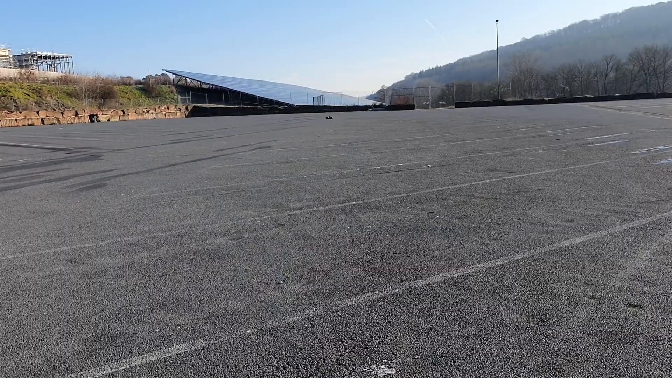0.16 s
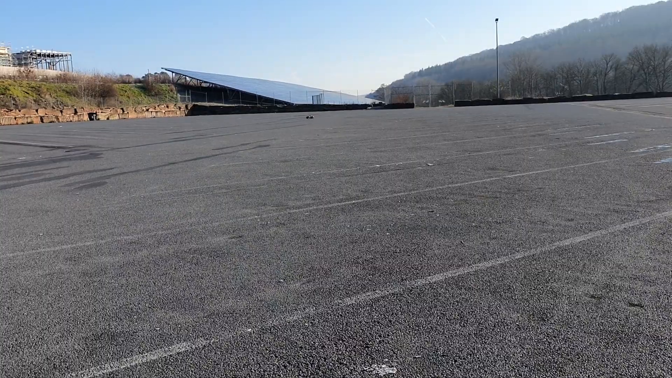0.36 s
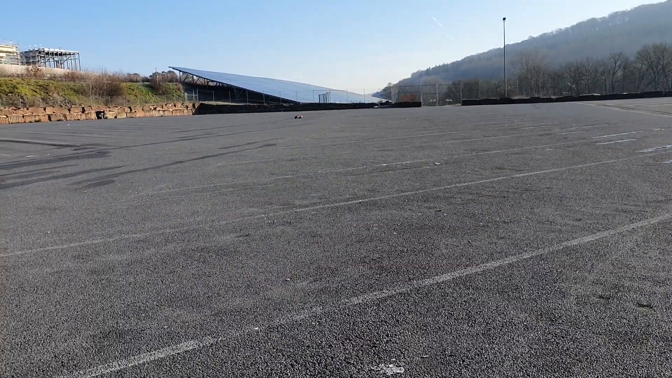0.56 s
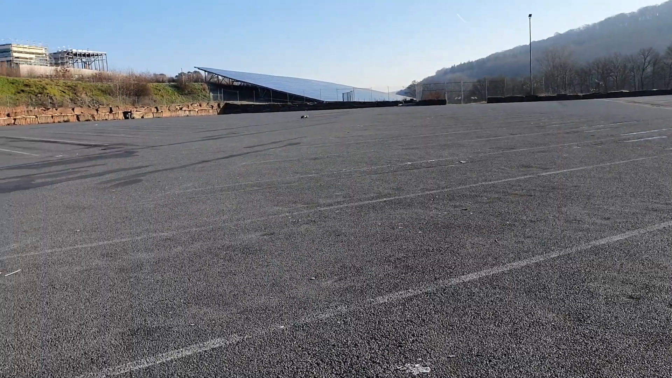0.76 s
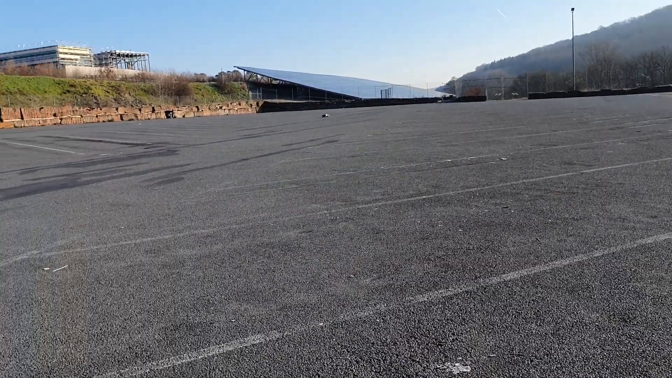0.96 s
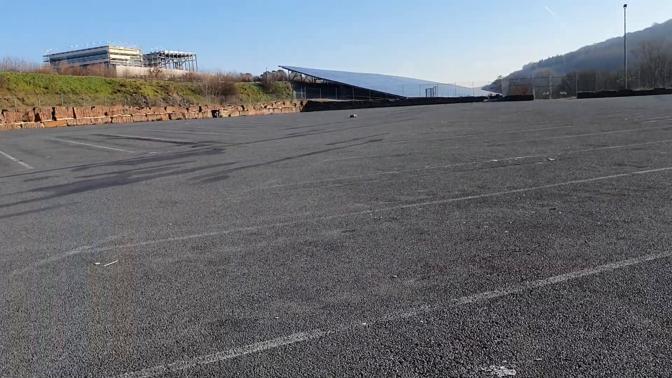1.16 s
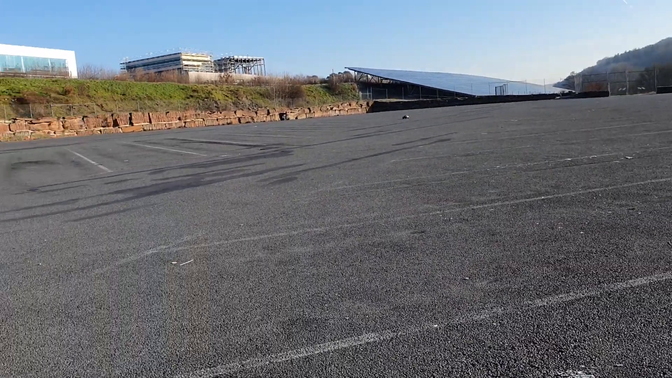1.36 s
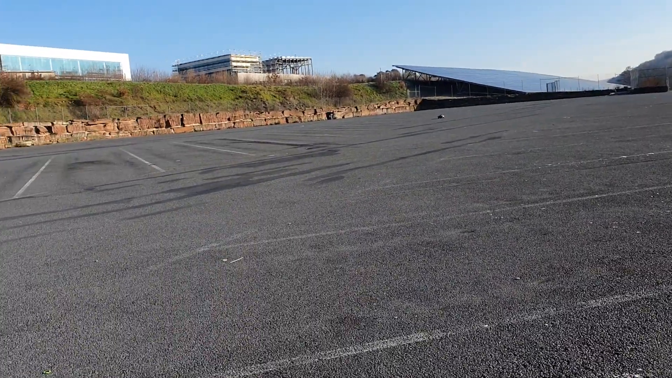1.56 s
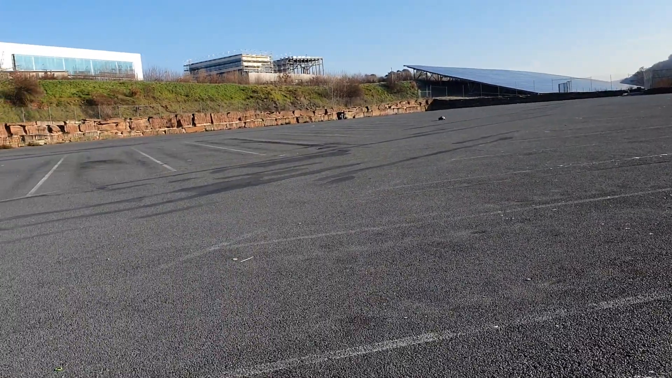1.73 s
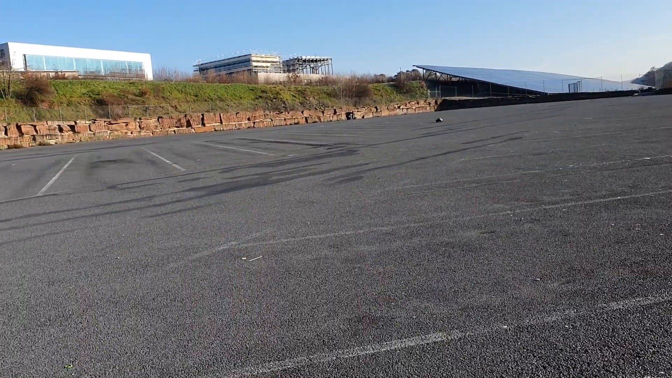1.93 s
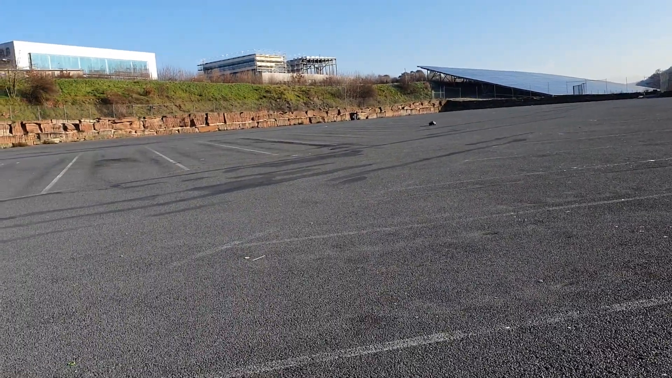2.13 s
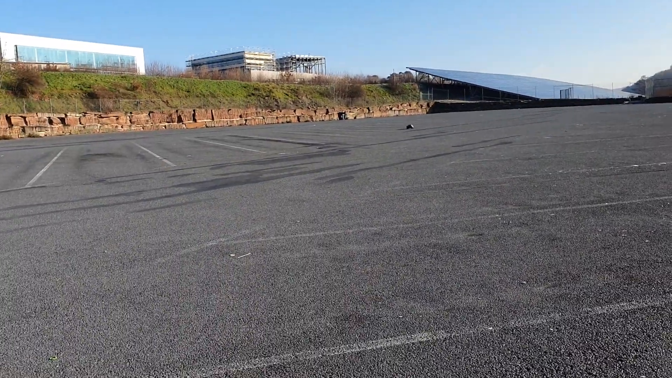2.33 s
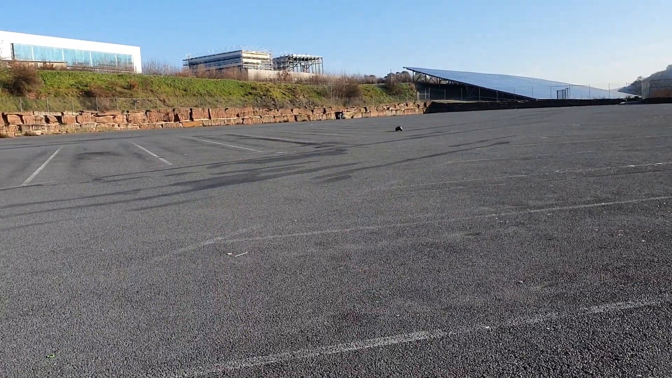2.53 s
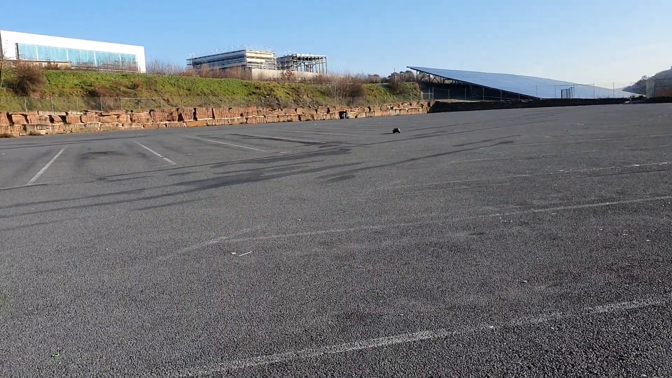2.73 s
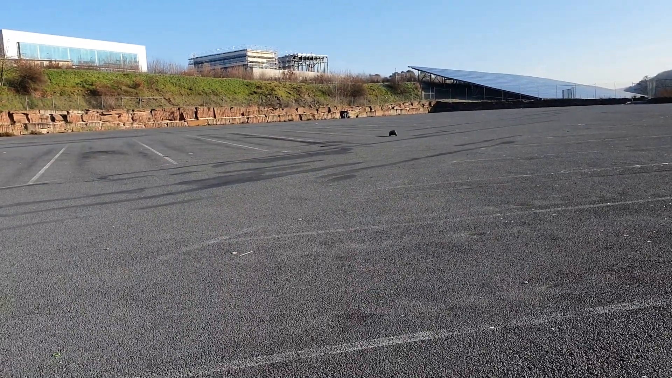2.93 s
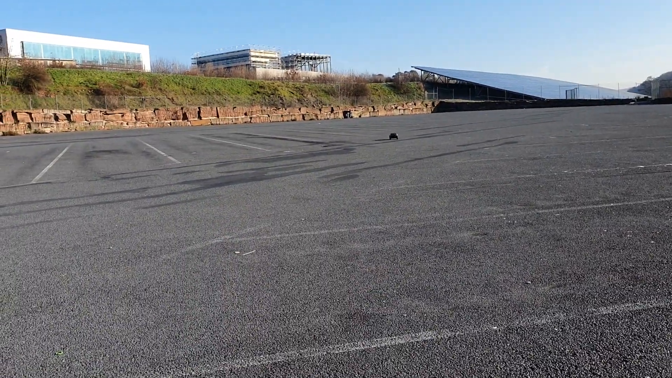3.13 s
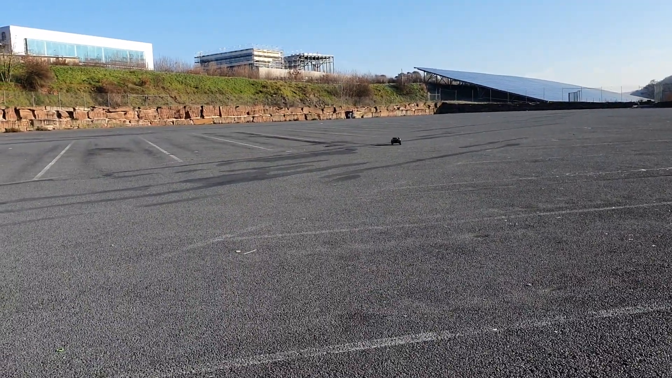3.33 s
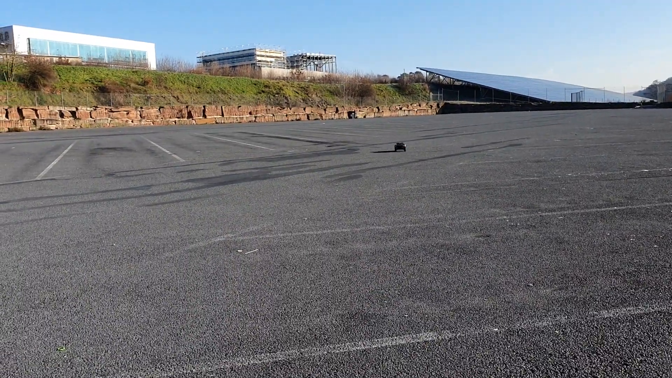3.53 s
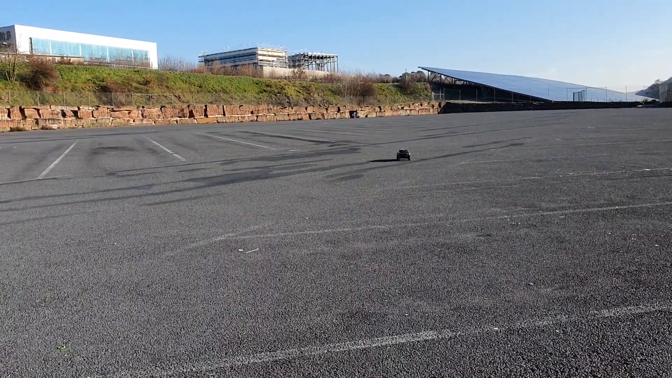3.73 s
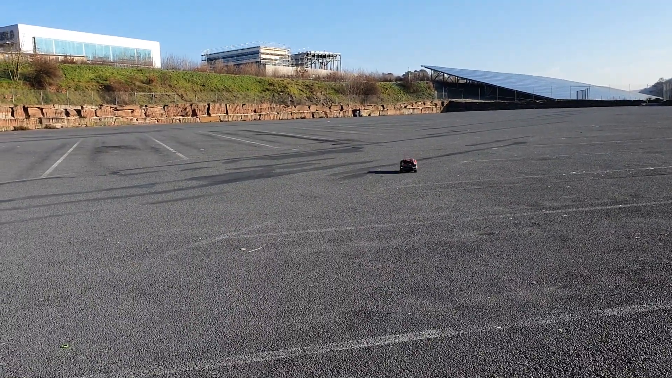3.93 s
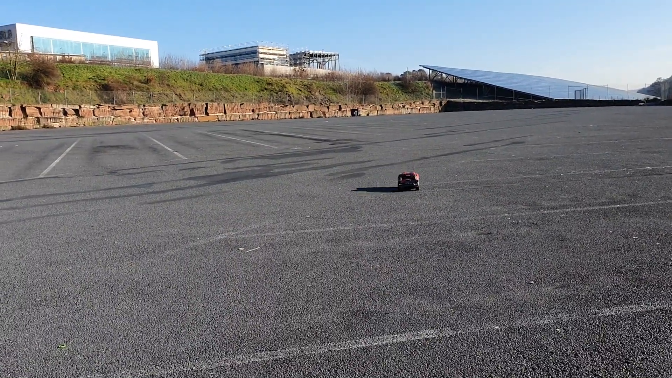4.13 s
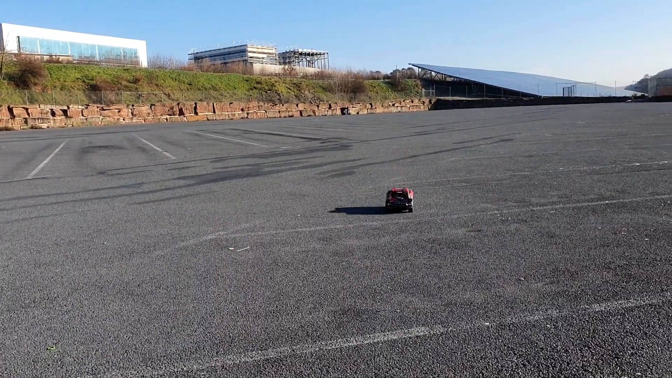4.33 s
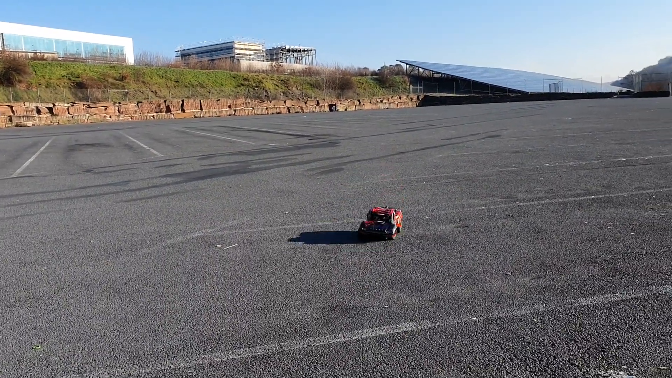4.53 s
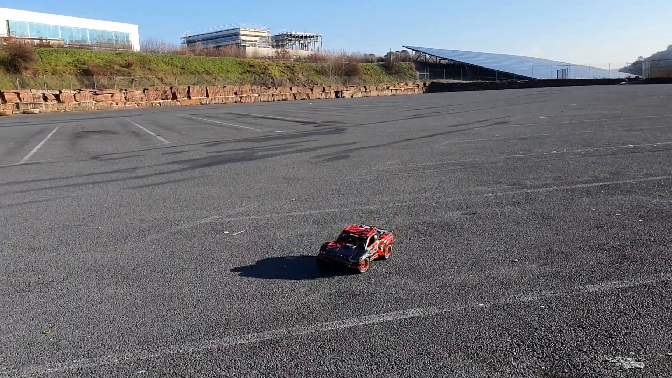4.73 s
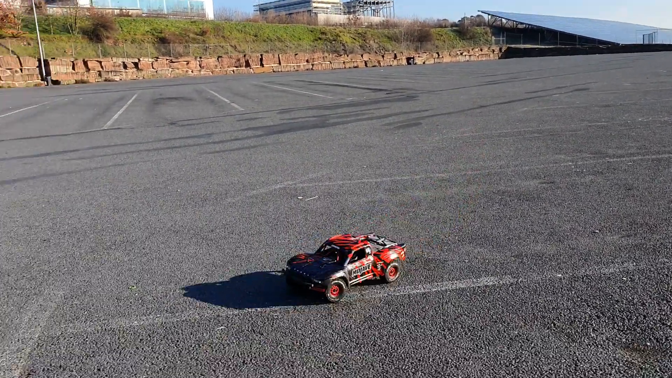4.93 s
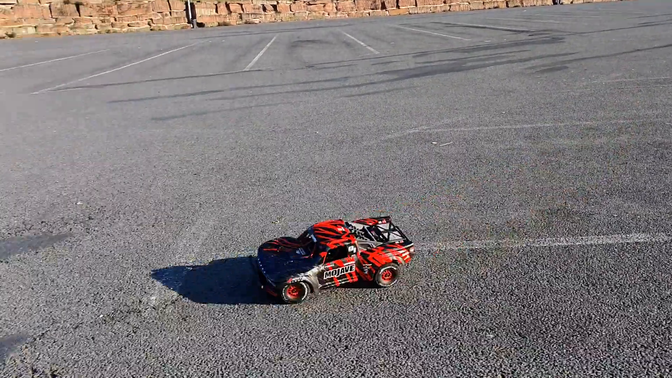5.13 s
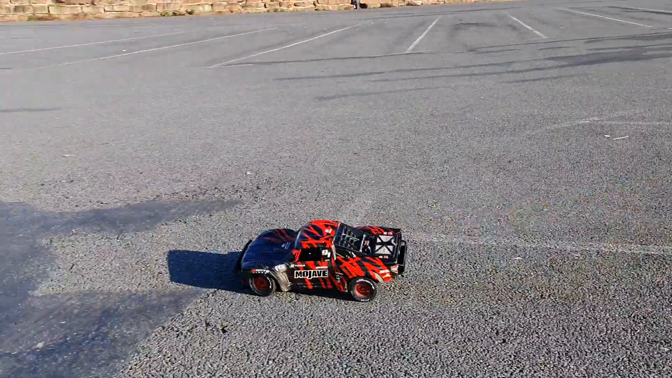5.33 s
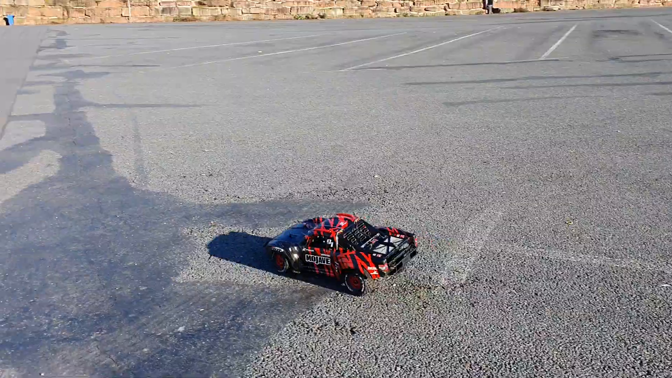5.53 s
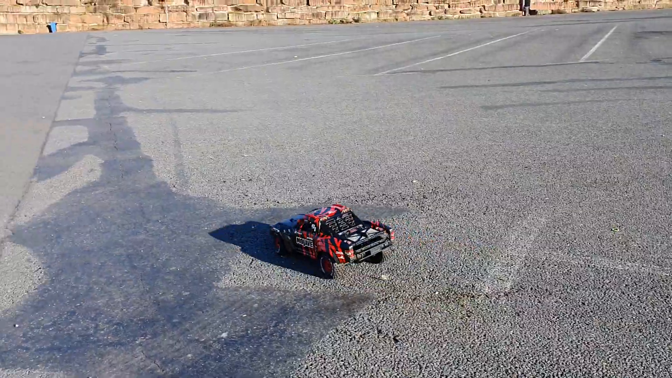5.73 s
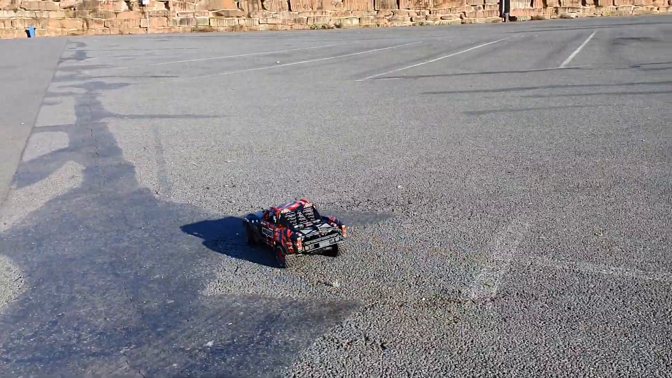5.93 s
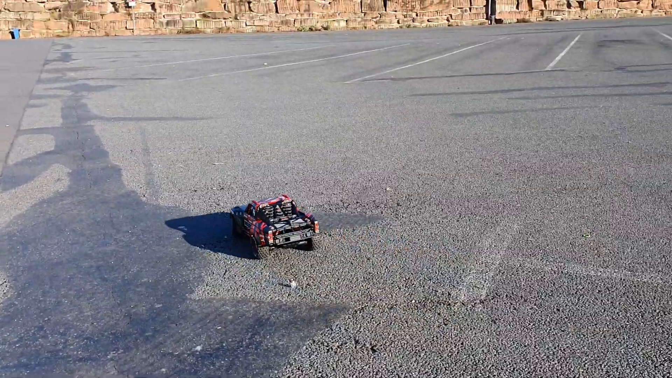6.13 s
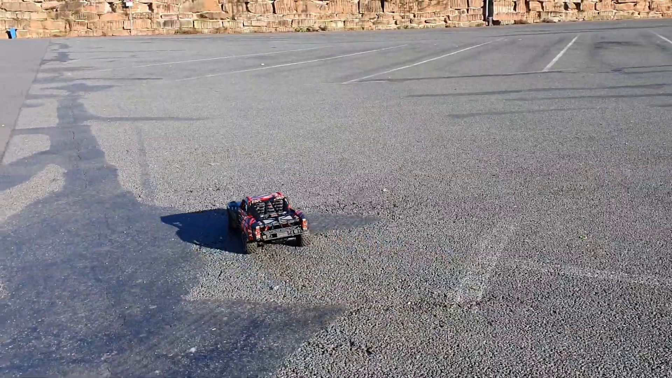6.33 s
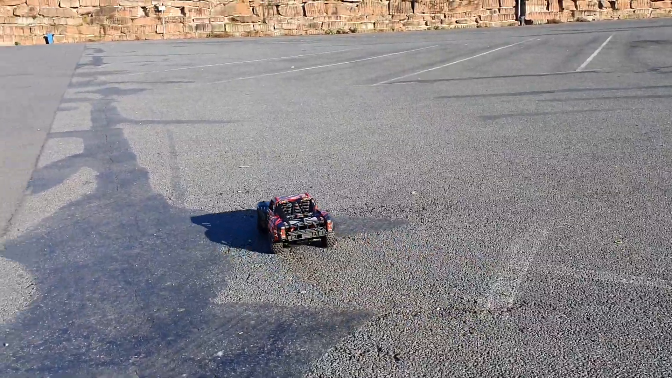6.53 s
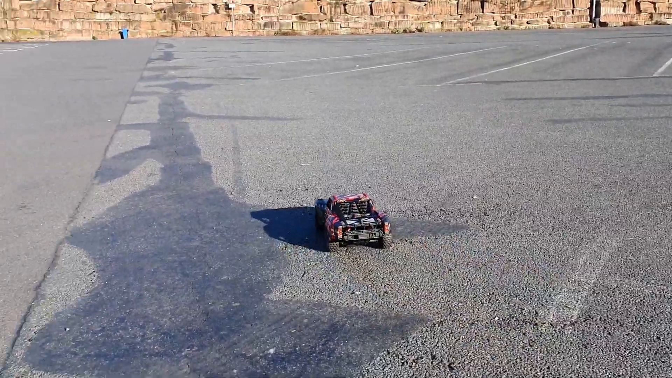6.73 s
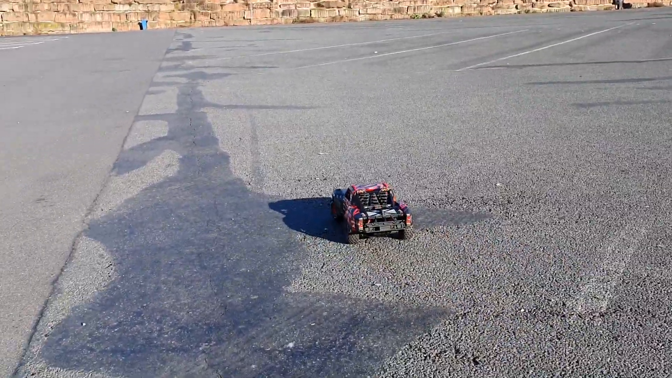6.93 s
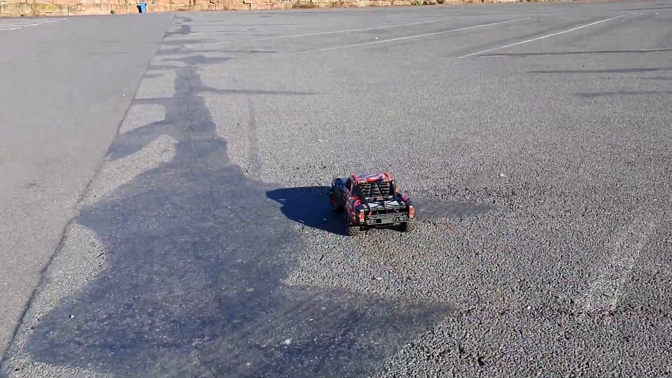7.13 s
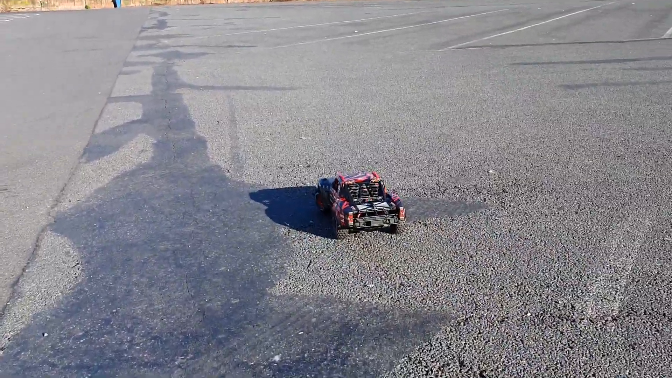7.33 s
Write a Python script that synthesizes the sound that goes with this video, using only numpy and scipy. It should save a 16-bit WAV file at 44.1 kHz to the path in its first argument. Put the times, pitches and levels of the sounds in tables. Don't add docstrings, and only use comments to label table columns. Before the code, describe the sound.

Distant tyre hiss and gear whine grow into a roaring, stone-spattered slide close by, then drop in pitch to quiet ticks over faint traffic rumble.

```python
import sys
import numpy as np
from scipy import signal
from scipy.fft import rfft, irfft, next_fast_len
from scipy.io import wavfile
from scipy.ndimage import uniform_filter1d, minimum_filter1d

SR = 44100
rng = np.random.default_rng(int(sys.argv[2]) if len(sys.argv) > 2 else 0)


def linear_from_db(decibels):
    return 10 ** (np.asarray(decibels, float) / 20)


def to_wav(sig):
    pcm = np.clip(np.atleast_2d(sig), -1, 1) * 32767
    pcm = np.round(pcm).astype(np.int16)
    wavfile.write(sys.argv[1], SR, pcm.T)


N = 325017

# time in seconds, level in dB.
NEARNESS = [(.02, -44.5), (.15, -41.5), (.24, -51.5), (.41, -39.5), (.6, -49.5), (.85, -44.5), (1.1, -43),
            (1.43, -41), (2.0, -36.5), (2.9, -31.5), (3.45, -28.5), (3.7, -23.5), (4.1, -29), (4.56, -24),
            (4.95, -33), (5.5, -31.5), (5.88, -38.5), (6.1, -47.5), (6.55, -70)]
# start in seconds, end in seconds, usual nearness in dB.
STAGES = [
    (0, 2.3, -44),
    (2.1, 3.803, -31),
    (3.793, 5.0, -28),
    (4.7, 6.55, -30),
]
# frequency in Hz, level in dB per Hz.
ROLL_OUT_COLOUR = [(100, -33), (170, -12.5), (205, -4), (304, 4), (473, -8), (711, 1.5), (944, -3.5),
                   (1180, -0.5), (1540, -11.5), (2000, -9), (2300, -9), (2670, -6.5), (3150, -9),
                   (3600, -8), (4200, -15.5), (4480, -22), (5050, -18.5), (5500, -31), (6200, -23.5),
                   (7300, -40.5), (9490, -70), (16100, -120)]
# frequency in Hz, level in dB per Hz.
ROLL_OUT_GRIT = [(4290, -44), (7300, -15.5), (8660, -1.5), (9570, -8), (14100, -14.5), (15200, -4),
                 (15800, -9.5)]


def read(rows, s):
    at, *columns = np.transpose(rows)
    return [np.interp(s, at, c) for c in columns]


def in_time(rows):
    return np.array(read(rows, np.arange(N) / SR))


def at_hz(points, hz):
    point_hz, db = np.transpose(points)
    return np.interp(np.log(hz + 1), np.log(point_hz), db)


def joined(body, grit):
    lift_db = body[-3][1] - grit[1][1]
    return [*body[:-2], *[(hz, db + lift_db) for hz, db in grit[2:]]]


def lasting(rows, fade_s):
    t = np.arange(N) / SR
    rise, fall = np.broadcast_to(fade_s, 2)
    nearest_end = np.minimum((t - rows[0][0]) / rise, (rows[-1][0] - t) / fall)
    return np.sqrt(np.clip(nearest_end, 0, 1))


def bumps(events, s):
    return sum(height * np.cos(np.pi / 2 * np.clip((s - at) / half, -1, 1)) ** 2 for at, half, height in events)


def drift(rate, size=N):
    r = np.exp(-40 * np.pi * rate / SR)
    white = rng.standard_normal(size // 20 + 4002)
    slow = signal.lfilter([1], [1, -2 * r, r * r], white)[4000:]
    return np.interp(np.arange(size) / 20, np.arange(len(slow)), slow / slow.std())


def late(x, delay_ms):
    return np.interp(np.arange(N) - delay_ms * SR / 1000, np.arange(N), x)


def filtered(x, order, edges_hz, kind):
    return signal.sosfiltfilt(signal.butter(order, edges_hz, kind, fs=SR, output="sos"), x)


def hiss_band(edges_hz):
    sos = signal.butter(2, edges_hz, "band", fs=SR, output="sos")
    band = signal.sosfilt(sos, rng.standard_normal((2, N)))
    return band / band.std()


def noise_bands(white, colour, likeness, low_hz):
    size = white.shape[1]
    hz = np.fft.rfftfreq(size, 1 / SR)
    alike = np.clip(at_hz(likeness, hz), 0, 1)
    spec = rfft(white) * linear_from_db(at_hz(colour, hz))
    spec = np.sqrt(alike) * spec[0] + np.sqrt(1 - alike) * spec[1:]
    centres = low_hz * 2 ** np.arange(0, np.log2(17000 / low_hz), 1 / 3)
    place = 3 * np.log2(np.maximum(hz, low_hz) / low_hz)
    bands = [irfft(spec * np.clip(1 - abs(place - k), 0, 1), size) for k in range(len(centres))]
    return centres, bands


def whine(rows, orders, width_hz, clean, gain_db):
    a, b = round(rows[0][0] * SR), round(rows[-1][0] * SR)
    hz, *levels = read(rows, np.arange(a, b) / SR)
    turns = 2 * np.pi * np.cumsum(uniform_filter1d(hz, size=SR // 60)) / SR
    out = np.zeros(N)
    for k, db in zip(orders, levels):
        tone, quarter = np.sin(k * turns), np.cos(k * turns)
        smear = drift(k * width_hz, b - a) * tone + drift(k * width_hz, b - a) * quarter
        out[a:b] += linear_from_db(db + gain_db) * (np.sqrt(2 * clean) * tone + np.sqrt(1 - clean) * smear)
    return out * lasting(rows, 0.0091)


def blows(events, crack_db, dullness):
    size = SR // 10
    out, noise = np.zeros(N), rng.standard_normal((len(events), size))
    t, body_hz = np.arange(size) / SR, np.fft.rfftfreq(size, 1 / SR)
    body = linear_from_db(dullness * at_hz(joined(ROLL_OUT_COLOUR, ROLL_OUT_GRIT), body_hz))
    body = body / (1 + (body_hz / 14300) ** 6)
    for (s, db, hz, t60, burst_s), n in zip(events, noise):
        burst = n * t * np.exp(-3.5 * t / abs(burst_s))
        r = linear_from_db(-60 / (max(t60, .002) * SR))
        mode = [1, 0.0021, 0.67], [1, -2 * r * np.cos(2 * np.pi * hz / SR), r * r]
        rung = signal.lfilter(*mode, signal.lfilter(*mode, burst))
        crack = irfft(rfft(np.diff(burst, prepend=0)) * body, size)
        at = round((s - 0.16 * abs(burst_s)) * SR)
        out[at:at + size] += linear_from_db(db) * (rung / abs(rung).max() + linear_from_db(crack_db) * crack / abs(crack).max())
    return out


def mesh_rate(s):
    # time in seconds, tooth-mesh rate in Hz.
    drive_speed = [(.8, 1043), (1.1, 1330), (1.37, 1420), (1.48, 1675), (1.84, 1745), (2.64, 1777),
                   (3.7, 1923), (3.85, 2120), (4.6, 2050), (4.79, 2065), (4.82, 1790), (4.87, 1830),
                   (4.915, 2050), (4.955, 1570), (5.05, 1610), (5.09, 1465), (5.17, 1460), (5.19, 1275),
                   (5.22, 1340), (5.285, 1340), (5.31, 1205), (5.42, 1150), (5.5, 1215), (5.65, 1045),
                   (5.7, 900), (5.8, 830), (5.9, 680), (5.97, 615), (6.06, 505), (6.2, 390)]
    return read(drive_speed, s)[0]


def traffic(patchy_db):
    # frequency in Hz, level in dB per Hz.
    road_colour = [(13, -54.5), (22, -43), (46, -8.5), (83, -3.5), (103, -8.5), (131, -12), (227, -22),
                   (356, -28), (694, -39), (745, -36), (1090, -35.5), (1890, -40.5), (6500, -76.5),
                   (8450, -112), (14300, -120)]
    # time in seconds, level in dB.
    road_level = [(0, -32.5), (.2, -35), (1.3, -33), (2.5, -34), (3.9, -32), (4.6, -35), (5.65, -35.5),
                  (5.97, -31), (6.04, -35.5), (6.6, -37), (7.1, -34), (7.37, -36)]
    # frequency in Hz, share common to both ports.
    road_likeness = [(30, .78), (80, .8), (140, .93), (300, .8), (640, .2), (1400, .1), (5000, .2)]
    white = rng.standard_normal((3, next_fast_len(N)))
    centres, bands = noise_bands(white, road_colour, road_likeness, low_hz=26.7)
    scale = sum(band for band, hz in zip(bands, centres) if hz < 170).mean(axis=0).std()
    swell, = in_time(road_level)
    steady = np.median(swell) - 1.5
    out = np.zeros((2, N))
    for band, hz in zip(bands, centres):
        level_db = swell if hz < 170 else steady
        out += band[:, :N] * linear_from_db(level_db + patchy_db * drift(4))
    return out / scale


def stage(count):
    # time in seconds, level in dB.
    tyre_scrub = [(3.78, -17), (3.87, -5.5), (4.05, -3.5), (4.15, 2), (4.25, -3), (4.31, -0.5),
                  (4.44, -5.5), (4.52, -2.5), (4.7, 4.5), (4.85, 2.5), (5.01, 5.5), (5.06, 2.5), (5.2, 0.5),
                  (5.5, -6), (5.86, -16), (6.5, -33)]
    # centre in seconds, half length in seconds, level change in dB.
    wheel_hops = [
        (3.755, 0.12, -6.5),
        (3.815, 0.013, -1),
        (3.85, .03, -2),
        (4.637, 0.037, -11),
        (4.835, 0.031, 0.5),
        (4.955, 0.07, -4.5),
        (6.03, 0.069, -7),
    ]
    # usual level in dB, share of nearness,
    # share of scrub.
    part_levels = [
        [(-44.5, .1, 0.016), (-46.5, 0.5, 0.0097), (-46, 0.74, 0.041), (-101, 3.2, 0.0026)],
        [(-42, 0.39, 0.035), (-41.5, 0.75, 0), (-33, 0.76, 0.024), (-65.5, 1.6, 0.017)],
        [(-25, .01, 0.89), (-30, .1, 0.37), (-28.5, 0.41, -0.18), (-51.5, .3, 0.44)],
        [(-28, 0.11, 1.3), (-28, 0.67, 0.65), (-28, 0.94, 0.0084), (-45, 1.3, 0.0093)],
    ]
    hop_share = [
        [.5, 0.22, 0.64, 0.75],
        [1.2, 0.18, 0.39, 0.13],
    ]
    start, end, usual_db = STAGES[count]
    s = np.linspace(start, end, 500)
    near = read(NEARNESS, s)[0] - usual_db
    scrub, hop = read(tyre_scrub, s)[0], bumps(wheel_hops, s)
    shares = zip(part_levels[count], hop_share[count // 2])
    return np.transpose([s, *[db + a * near + b * scrub + c * hop for (db, a, b), c in shares]])


def roar(rows, colour, mesh_hz, fade_s, grit, patchy_db, lumpy):
    part_edges_hz = [170, 450, 1500, 7000, 15800]
    # frequency in Hz, share common to both ports.
    truck_likeness = [(200, 1), (1000, 0.94), (3000, 0.95), (5500, 0.58), (8000, 0.23), (15000, .3)]
    a, b = round(rows[0][0] * SR), min(round(rows[-1][0] * SR), N)
    size = next_fast_len(b - a)
    hits = rng.random(size) < 400 / SR
    stones = hits * linear_from_db(3.0 * np.minimum(rng.exponential(1, size), 4)) * rng.choice([-1, 1], size)
    white = rng.standard_normal((3, size)) + grit * stones
    centres, bands = noise_bands(white, colour, truck_likeness, low_hz=part_edges_hz[0])
    part = np.clip(np.searchsorted(part_edges_hz, centres * 1.001) - 1, 0, 3)
    together, out = drift(2.9, size), np.zeros((2, N))
    for k, level_db in enumerate(in_time(rows)[:, a:b]):
        mine = [band for band, p in zip(bands, part) if p == k]
        level_db = minimum_filter1d(level_db, size=SR // 30)
        level_db = -minimum_filter1d(-level_db, size=SR // 30)
        scale = sum(mine).mean(axis=0).std()
        flicker = sum(band * linear_from_db(patchy_db * (0.31 * together + drift(21.0, size))) for band in mine)
        out[:, a:b] += linear_from_db(level_db) * flicker[:, :b - a] / scale
    wheel_hz = mesh_hz / 39.0 * (1 + 0.033 * drift(4.35))
    wheel = 1 + lumpy * np.sin(2 * np.pi * np.cumsum(wheel_hz) / SR)
    return out * wheel * lasting(rows, fade_s)


def rolling():
    # frequency in Hz, level in dB per Hz.
    far_colour = [(100, -26.5), (170, -2), (268, 3), (589, -16.5), (1040, -9), (1660, -10.5), (1800, -8.5),
                  (1950, -7.5), (2670, -2.5), (3770, -16.5), (4080, -18), (4630, -20.5), (5330, -23.5),
                  (5900, -32), (6300, -42), (7300, -61), (9490, -87), (16100, -120)]
    far_grit = [(4290, -45), (7300, -7), (9570, -1), (11800, -19), (15300, -27.5), (15800, -18)]
    run_in_colour = [(100, -29.5), (170, -9), (273, -9), (589, -21), (758, -16.5), (1590, -10.5),
                     (1830, -2), (2070, -5.5), (2430, 7.5), (3020, -5), (3710, -9), (4630, -17.5),
                     (5500, -18.5), (6440, -34.5), (7300, -36.5), (9490, -68), (16100, -120)]
    run_in_grit = [(4290, -30), (7300, 4), (8010, -1), (9570, 0), (11400, -9.5), (13100, -10),
                   (15800, -7.5)]
    slide_colour = [(100, -53), (170, -28), (264, -6), (391, -13), (598, -22), (1160, -12), (1640, -18.5),
                    (1980, -11), (2350, -3.5), (2750, -11.5), (3270, -13), (3750, -19), (4210, -25),
                    (4580, -26), (4950, -22.5), (6000, -32), (6600, -46.5), (7300, -47.5), (9490, -79),
                    (16100, -120)]
    slide_grit = [(4290, -43), (7300, -21.5), (8630, -6), (9940, -11), (12000, -13), (14000, -23.5),
                  (15800, -2)]
    mesh_hz = mesh_rate(np.arange(N) / SR)
    out = roar(stage(0), joined(far_colour, far_grit), mesh_hz, [.001, .2], grit=0.15, patchy_db=1.6, lumpy=0.14)
    out += roar(stage(1), joined(run_in_colour, run_in_grit), mesh_hz, [.2, .01],
                grit=0.36, patchy_db=0.92, lumpy=0.15)
    out += roar(stage(2), joined(slide_colour, slide_grit), mesh_hz, [.01, .3],
                grit=0.91, patchy_db=1.07, lumpy=0.15)
    out += roar(stage(3), joined(ROLL_OUT_COLOUR, ROLL_OUT_GRIT), mesh_hz, [.3, .05],
                grit=0.74, patchy_db=1.43, lumpy=0.15)
    return out


def underside(truck):
    # time in seconds, delay in ms, level in dB.
    shell_echo = [(0, .9, -14), (1.6, .96, -5), (2.8, .92, -5), (3.7, .89, -9), (3.9, .93, -19),
                  (5.0, .96, -18.5), (6.5, .77, -21)]
    echo_band_hz = [3200, 7000]
    delay_ms, db = in_time(shell_echo)
    band = filtered(truck, 2, echo_band_hz, "band")
    return truck + linear_from_db(db) * np.array([late(side, delay_ms) for side in band])


def ground(truck, above_hz, bounce_ms):
    # time in seconds, delay in ms, level in dB.
    ground_echo = [(0, .72, -3), (2.9, .714, -3), (3.3, .833, -3), (3.7, .84, -3), (3.85, .9375, -2),
                   (4.2, .96, -2), (4.45, .98, -5), (4.7, 1.0, -16), (6.6, 1.0, -18)]
    bright = filtered(truck, 2, above_hz, "high")
    delay_ms, echo_db = in_time(ground_echo)
    delay_ms = delay_ms + bounce_ms * drift(8.1)
    return truck + linear_from_db(echo_db) * np.array([late(side, delay_ms) for side in bright])


def tread_howl():
    # time in seconds, frequency in Hz, level in dB.
    howl_curve = [(0, 2275, -46.5), (.2, 2250, -58), (.4, 2360, -44), (.9, 2313, -57.5), (1.0, 2425, -44),
                  (1.1, 2540, -45), (1.5, 2700, -43), (2.0, 2700, -38), (2.5, 2690, -46), (2.9, 2645, -39)]
    return whine(howl_curve, [1], width_hz=136, clean=0.011, gain_db=1.3)


def sliding_strands():
    # time in seconds, frequency in Hz, level in dB.
    strands = [
        [(0, 5000, -62), (.15, 5100, -62.5), (.24, 5000, -65), (.4, 5050, -64), (.6, 5100, -70)],
        [(.9, 2760, -64), (1.2, 3026, -60), (1.55, 3453, -61), (2.0, 3230, -75), (2.4, 3250, -51)],
        [(1.0, 3950, -58), (1.35, 4180, -64.5), (1.9, 4070, -71), (2.6, 4450, -57.5), (3.0, 4500, -61),
         (3.4, 4126, -58), (3.72, 4150, -49)],
        [(1.2, 2281, -54.5), (2.0, 2343, -45), (2.8, 2382, -52.5), (3.72, 2358, -29.5)],
        [(3.8, 4325, -45.5), (4.2, 4127, -41), (4.6, 4170, -41), (5.1, 4046, -50.5), (5.4, 4070, -52)],
        [(3.8, 3210, -36), (4.2, 3097, -43), (4.55, 3038, -34), (4.75, 3290, -43), (5.0, 3060, -37),
         (5.17, 2975, -40), (5.25, 3140, -45)],
        [(5.2, 2683, -50), (5.27, 2724, -33), (5.34, 2750, -50), (5.5, 2643, -58), (5.75, 2622, -37),
         (5.95, 2490, -48)],
        [(5.35, 3510, -56), (5.5, 3580, -33), (5.75, 3850, -45), (5.9, 3920, -54), (6.4, 3830, -65)],
        [(5.5, 2100, -48), (5.68, 2017, -42), (5.82, 1910, -47)],
        [(5.9, 3250, -53), (6.1, 3170, -47), (6.3, 2970, -56)],
        [(5.98, 1270, -53), (6.15, 1327, -49.5), (6.4, 1250, -63)],
    ]
    return sum(whine(rows, [1], width_hz=140, clean=0, gain_db=1.04) * linear_from_db(1.8 * drift(7.5)) for rows in strands)


def rubs():
    # centre in seconds, half length in seconds, level in dB.
    finger_shifts = [
        (.14, .08, -80),
        (0.698, .05, -81),
        (0.919, 0.17, -75),
        (1.143, 0.17, -71.5),
        (6.728, 0.17, -77),
        (6.95, 0.13, -70.5),
    ]
    # frequency in Hz, half width in Hz, level in dB.
    case_bands = [
        (8430, 310, -4.5),
        (5000, 850, -4.5),
    ]
    hiss = sum(linear_from_db(db) * hiss_band([hz - width_hz, hz + width_hz]) for hz, width_hz, db in case_bands)
    strokes = [(at, half, linear_from_db(db)) for at, half, db in finger_shifts]
    return hiss * linear_from_db(2.1 * drift(40.0)) * bumps(strokes, np.arange(N) / SR)


def taps():
    # time in seconds, peak in dB, ring frequency in Hz.
    hand_taps = [(.6735, -74, 12500), (.6774, -68, 9000), (.6774, -69, 12500), (.6873, -60, 8700),
                 (.6873, -59, 13200), (.7004, -66, 13500), (.7004, -70, 10500), (.721, -71, 12200),
                 (.7305, -69, 11500), (.7525, -66, 13500), (.787, -70, 12500), (.8525, -66, 12500),
                 (.8525, -68, 9200), (.858, -71, 11000), (.8745, -72, 12500), (6.0315, -64, 11000),
                 (6.1245, -60, 13500), (6.1245, -56, 11500), (6.1245, -55, 9000), (6.2101, -67, 12000),
                 (6.2361, -67, 12000), (6.2565, -64, 13500), (6.3523, -66, 12000), (6.3749, -66, 11000),
                 (6.4123, -66, 11000), (6.4945, -73, 11000), (6.559, -72, 11000)]
    tap_ring = (.002, .001)
    return blows([(*row, *tap_ring) for row in hand_taps], crack_db=-1, dullness=.05)


def rustle():
    # centre in seconds, half length in seconds, level in dB.
    sleeve_brushes = [
        (0.734, .07, -80.5),
        (.87, 0.037, -82),
    ]
    cloth_band_hz = [9500, 14300]
    strokes = [(at, half, linear_from_db(db)) for at, half, db in sleeve_brushes]
    return hiss_band(cloth_band_hz) * linear_from_db(2.5 * drift(90.0)) * bumps(strokes, np.arange(N) / SR)


def gears_pulling():
    # time in seconds, level of mesh tone in dB, of octave in dB, of twelfth in dB.
    pull_load = [(.8, -54, -60, -66), (1.4, -53, -61, -68), (1.84, -51, -59, -67), (2.27, -46, -53, -59),
                 (2.64, -43, -47, -49), (2.95, -42, -44, -48), (3.4, -40, -41, -52), (3.69, -37, -40, -51),
                 (3.73, -56, -60, -66)]
    s = np.linspace(pull_load[0][0], pull_load[-1][0], 500)
    rows = np.transpose([s, mesh_rate(s), *read(pull_load, s)])
    return whine(rows, [1, 2, 3], width_hz=65, clean=.33, gain_db=2)


def gear_rattle():
    # multiple of mesh rate, level in dB.
    rattle_bands = [
        (3.0, -53),
    ]
    rattle_span_s = (1.6, 3.72)
    s = np.linspace(*rattle_span_s, 200)
    follow_db = 0.4 * (read(NEARNESS, s)[0] - STAGES[1][2])
    rows = np.transpose([s, mesh_rate(s), *[db + follow_db for _, db in rattle_bands]])
    return whine(rows, [k for k, _ in rattle_bands], width_hz=72, clean=.01, gain_db=-7.0)


def controller_switching():
    # time in seconds, frequency in Hz, level in dB.
    switching_curve = [(1.7, 15000, -96), (2.25, 15000, -83), (2.6, 15000, -88), (3.77, 15300, -70),
                       (3.82, 15450, -60), (4.0, 15400, -61), (4.3, 15050, -62), (4.65, 15450, -61),
                       (5.1, 15350, -60), (5.38, 15300, -65), (5.48, 15000, -59), (5.9, 14950, -62),
                       (6.0, 14900, -72), (6.06, 14900, -90)]
    return whine(switching_curve, [1], width_hz=130, clean=0, gain_db=-1)


def motor_shaft():
    # time in seconds, frequency in Hz, level in dB.
    shaft_curve = [(2.95, 736, -52), (3.3, 762, -48.5), (3.73, 793, -71)]
    return whine(shaft_curve, [1], width_hz=12, clean=.5, gain_db=0)


def knocks():
    # time in seconds, peak in dB, ring in Hz, decay to -60 dB in seconds, burst in seconds.
    knock_events = [(3.7965, -22, 3300, .004, .007), (3.798, -32, 5200, .004, .012),
                    (3.8025, -15, 3400, .004, .009), (3.804, -23, 4370, .004, .01),
                    (3.806, -29, 5200, .004, .008), (3.820, -19, 3200, .006, .018),
                    (3.8245, -19, 2450, .005, .01), (3.822, -26, 4650, .004, .014),
                    (3.838, -26, 4300, .005, .016), (3.858, -30, 5200, .004, .01),
                    (3.922, -20, 2400, .004, .006), (3.940, -20, 2400, .004, .006),
                    (4.275, -20.5, 2540, 0.05, 0.03)]
    return blows(knock_events, crack_db=-10, dullness=0.88)


def gears_braking():
    # time in seconds, level in dB, step per overtone in dB.
    drag_load = [(3.85, -38, -11), (4.6, -44, -13), (4.66, -36, -18), (4.8, -33, -16), (4.85, -37, -16),
                 (4.91, -30, -22), (5.04, -36, -16), (5.12, -35, -16), (5.2, -32, -12), (5.55, -33, -14),
                 (5.66, -40, -12), (5.79, -38, -14), (5.83, -47, -6), (5.9, -46, 9), (5.96, -49, 9),
                 (6.0, -62, 0), (6.06, -60, -6), (6.12, -53, -6), (6.2, -57, -10)]
    # centre in seconds, half length in seconds, level change in dB.
    teeth_part = (4.995, .045, -10)
    s = np.linspace(drag_load[0][0], drag_load[-1][0], 500)
    db, step_db = read(drag_load, s)
    db = db + bumps([teeth_part], s)
    rows = np.transpose([s, mesh_rate(s), db, db + step_db])
    return whine(rows, [1, 2], width_hz=40, clean=.3, gain_db=1.5)


def controller_singing():
    # time in seconds, level in dB.
    brake_songs = [
        [(3.85, -44), (4.2, -39), (4.55, -42)],
        [(5.72, -40), (5.79, -42), (5.85, -52), (5.885, -38), (5.95, -40), (5.99, -45), (6.08, -43),
         (6.108, -53), (6.15, -44), (6.2, -46), (6.245, -64), (6.265, -47), (6.3, -52), (6.34, -49),
         (6.385, -51), (6.42, -62), (6.5, -67), (6.54, -74)],
    ]
    sing_hz = [1042, 1002]
    sing_third_db = [-56, -60]
    # time in seconds, frequency in Hz, level in dB.
    sing_octave = [(5.6, 2004, -48), (5.67, 2004, -39), (5.72, 2004, -43), (5.77, 2004, -44),
                   (5.8, 2004, -55)]
    out = whine(sing_octave, [1], width_hz=20, clean=.6, gain_db=0)
    for song, hz, third_db in zip(brake_songs, sing_hz, sing_third_db):
        rows = [(s, hz, db, min(third_db, db + 6)) for s, db in song]
        out += whine(rows, [1, 3], width_hz=10, clean=.82, gain_db=-1) * linear_from_db(2.5 * drift(30.0))
    return out


def sharp_stone():
    # time in seconds, peak in dB, ring in Hz, decay to -60 dB in seconds, burst in seconds.
    stone_modes = [
        (4.5838, -9, 2440, .003, .009),
        (4.585, -13, 1290, .003, .009),
        (4.5842, -18, 4200, .003, .009),
        (4.5895, -12, 3020, .0037, .007),
        (4.584, -28, 8700, .002, .008),
        (4.5842, -30, 10600, .002, .007),
        (4.585, -33, 13000, .002, .007),
    ]
    return blows(stone_modes, crack_db=-11.0, dullness=0.95)


def tyre_judder():
    # time in seconds, frequency in Hz, level in dB.
    judder_curve = [(4.95, 196.6, -45), (5.12, 164.6, -38), (5.3, 144.6, -36.5), (5.45, 124.6, -50)]
    return whine(judder_curve, [1], width_hz=17.0, clean=0.099, gain_db=1.5)


def shell_thump():
    # time in seconds, frequency in Hz, level in dB.
    thump_curve = [(5.915, 75, -37), (5.948, 73.4, -25), (5.963, 70, -30), (5.98, 66, -24), (6.0, 60, -46)]
    return whine(thump_curve, [1], width_hz=5, clean=0.85, gain_db=-2)


def suspension_ticks():
    # time in seconds, peak in dB.
    settling = [
        (6.5907, -40.5),
        (6.6677, -47),
        (6.6725, -46),
        (6.703, -43),
        (6.7214, -44),
        (6.7428, -48),
        (6.765, -51),
        (6.7885, -53),
    ]
    # level in dB, ring in Hz, decay to -60 dB in seconds, burst in seconds.
    tick_rings = [
        (1, 2480, .005, .009),
        (-7, 1280, .0033, .010),
        (-15, 3300, .002, .008),
        (-20.5, 8600, .0067, .012),
    ]
    events = [(s, db + ring_db, *ring) for s, db in settling for ring_db, *ring in tick_rings]
    return blows(events, crack_db=-16.0, dullness=1.8)


def scene():
    # time in seconds, lag in ms.
    left_lag = [(0, 0.011), (1, 0.049), (2, 0.085), (3.5, 0.03), (4.2, 0.022), (5, -0.029), (5.8, -0.037),
                (6.6, -0.086)]
    truck = underside(rolling())
    truck += tread_howl() + sliding_strands()
    truck += gears_pulling() + gear_rattle() + controller_switching() + motor_shaft()
    truck += knocks() + gears_braking() + controller_singing() + sharp_stone()
    truck += tyre_judder() + shell_thump()
    truck = ground(truck, above_hz=7500, bounce_ms=.008)
    truck[0] = late(truck[0], in_time(left_lag)[0])
    truck += suspension_ticks()
    hand = rubs() + taps() + rustle()
    return truck + hand + traffic(patchy_db=1.5)


def port(peaks, hz):
    out, s = 1, 1j * hz
    for top_hz, width_hz, db in peaks:
        g = linear_from_db(db / 2)
        out = out * (s * s + s * width_hz * g + top_hz ** 2) / (s * s + s * width_hz / g + top_hz ** 2)
    return out


def low_pass(x):
    return signal.sosfilt(signal.butter(12, 15830, fs=SR, output="sos"), x)


def record(dry):
    # frequency in Hz, width in Hz, level in dB.
    left_port = [
        (2940, 110, -9.5),
        (9500, 2200, 14.5),
    ]
    right_port = [
        (2700, 1660, 12.7),
        (5700, 1200, 8.7),
    ]
    size = next_fast_len(N + 4096)
    hz = np.fft.rfftfreq(size, 1 / SR)
    ports = np.array([port(left_port, hz), port(right_port, hz)])
    heard = irfft(rfft(dry, size) * (hz < 15900) * ports / ports.mean(axis=0), size)[:, :N]
    hiss_sos = signal.butter(6, 7850, "high", fs=SR, output="sos")
    heard += linear_from_db(-80.5) * signal.sosfilt(hiss_sos, rng.standard_normal((2, N)))
    return low_pass(heard)


dry = scene()
out = record(dry)
to_wav(out)
```